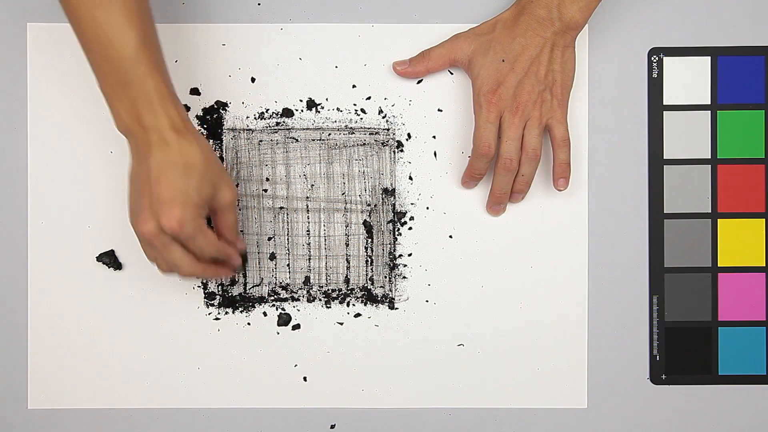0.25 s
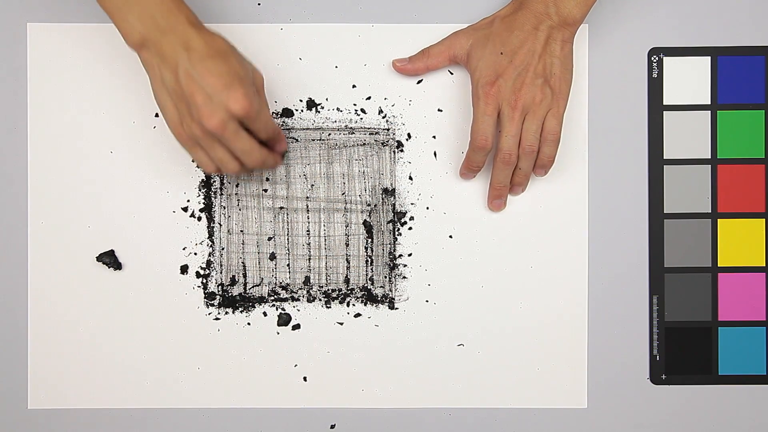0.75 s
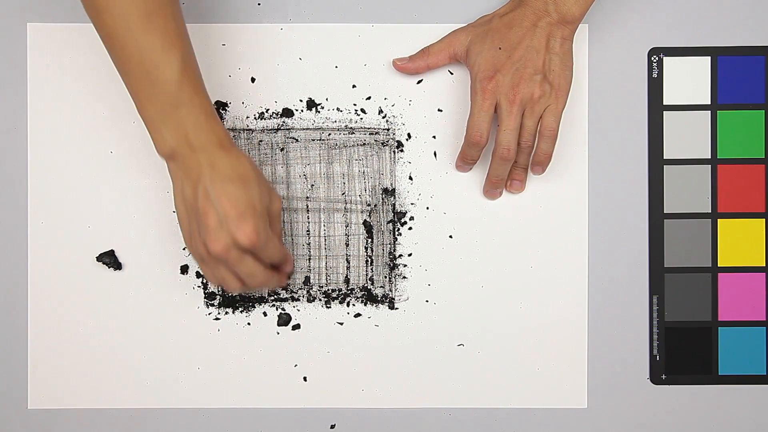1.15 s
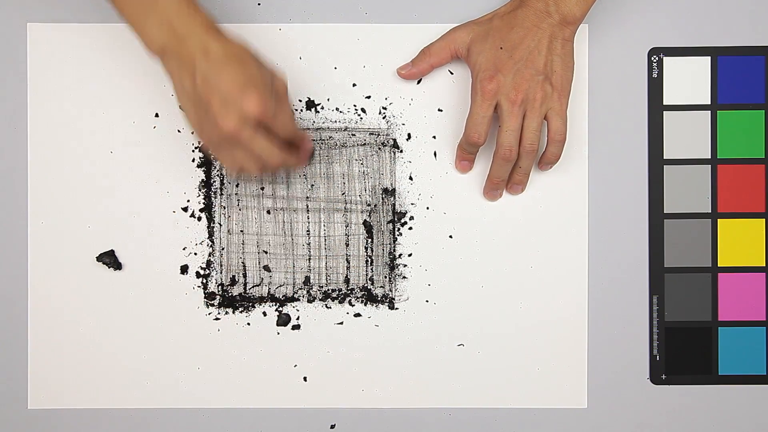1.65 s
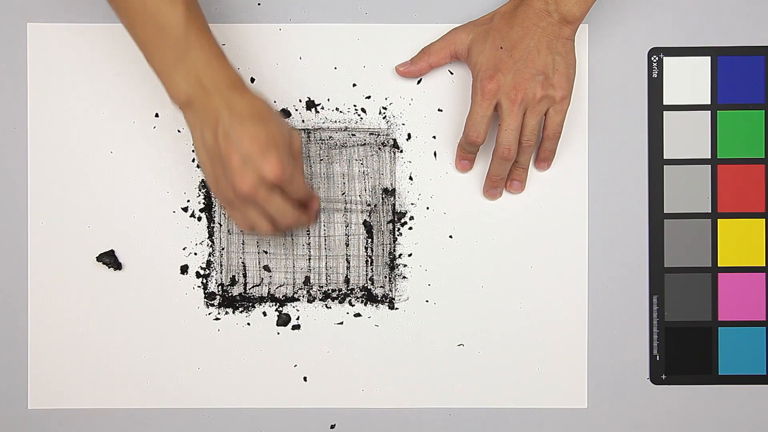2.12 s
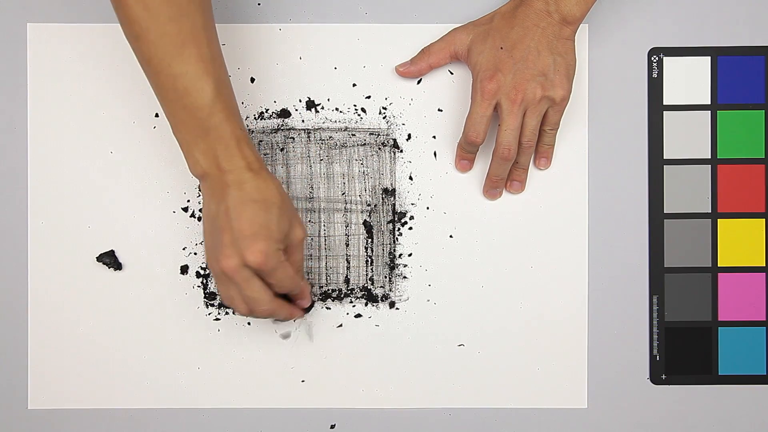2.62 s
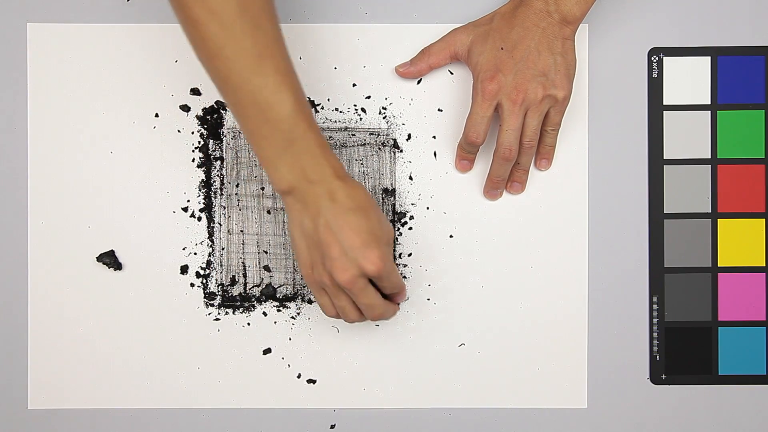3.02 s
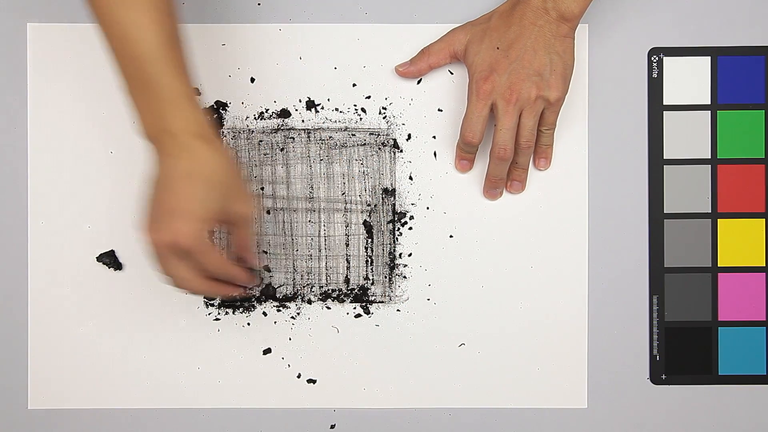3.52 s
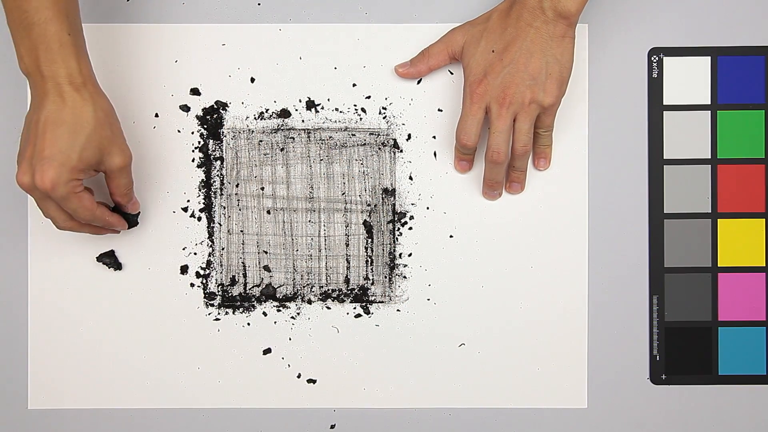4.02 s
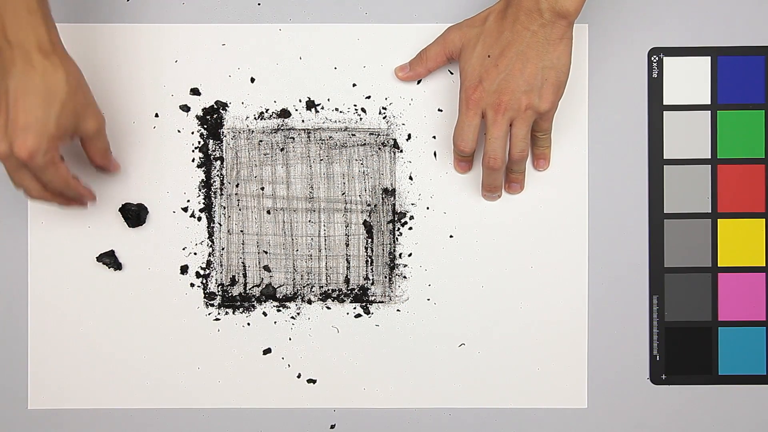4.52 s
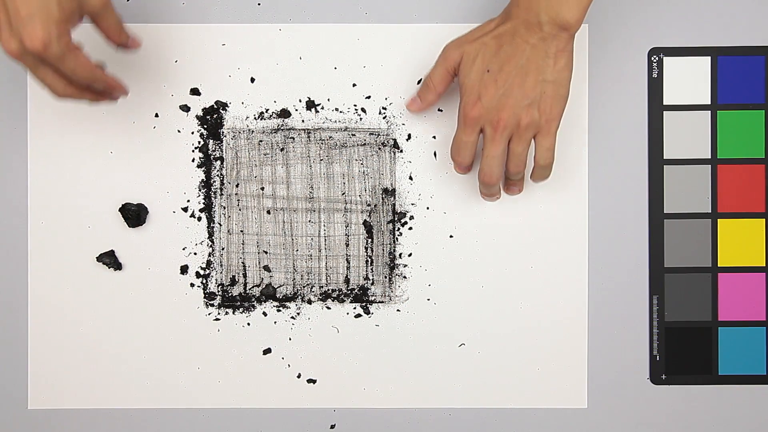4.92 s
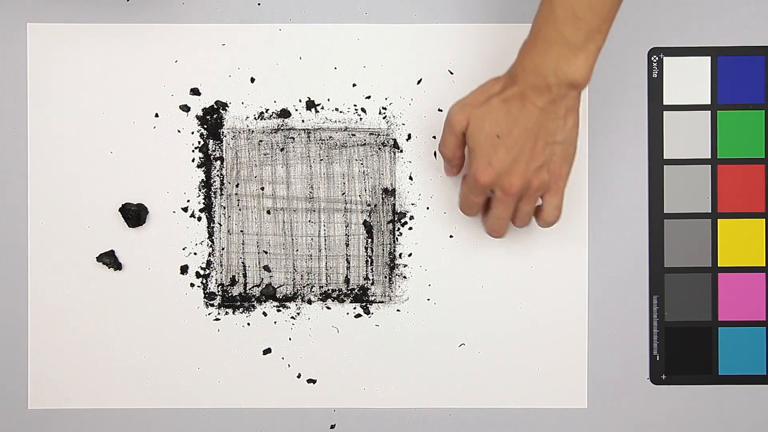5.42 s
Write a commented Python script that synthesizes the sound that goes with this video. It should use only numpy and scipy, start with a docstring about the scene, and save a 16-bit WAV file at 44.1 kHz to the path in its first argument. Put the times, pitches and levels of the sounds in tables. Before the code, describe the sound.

Very close, dry stereo sound in a small quiet room. It opens on the clipped tail of a charcoal stroke, a bright scratch with sharp ticks, gone within 0.1 s; a small knock follows at 0.35 s. From about 0.7 to 1.4 s the lump scrapes heavy paper, swelling to its strongest near 1.1 s, hissy and gritty, with tiny snaps afterwards. A second, coarser stroke grinds from 1.9 to 2.6 s, ending in a cluster of loud, brittle crumb snaps and a dull table knock at 2.7 s, then crackles fading by 2.9 s. A short scratch comes at 3.1 to 3.35 s, with little clicks at 3.5 s. Then it is nearly quiet: soft low pops in alternating strong and weak turns until 5.2 s, a light set-down tap at 4.2 s, faint skin rustles, clearest with a soft bump at 5.2 to 5.3 s, over slightly rising room rumble and hiss.

```python
"""On a table in a quiet room, a lump of charcoal is dragged over heavy paper close to a stereo microphone.
Shaped noise and uneven jolts make the grit catching on the paper's tooth; decaying rings and noise bursts
make the snapping crumbs. Resonances hum as the table, and the stand sways at the bottom of hearing.
Later the lump is set down, swells of noise brush by as a hand slides off the sheet, and soft low pops,
single pushes of pressure, come in strong and weak turns."""
import sys
import numpy as np
from scipy import signal
from scipy.fft import rfft, irfft, next_fast_len
from scipy.io import wavfile
from scipy.ndimage import uniform_filter1d, map_coordinates

SR = 44100
rng = np.random.default_rng(int(sys.argv[2]) if len(sys.argv) > 2 else 0)


def int16_out(signal):
    """Quantize to a 16-bit WAV file."""
    q = np.round(np.clip(np.atleast_2d(signal).T, -1, 1) * 32767)
    wavfile.write(sys.argv[1], SR, q.astype(np.int16))


N = 249606

# One curve for each stroke of the lump, from touch to lift: (t/s, hiss level/dB, grind level/dB)
STROKES = [
    [(0, -38.5, -54.5), (.035, -52.5, -61), (.06, -61.5, -73.5)],
    [(.685, -67, -73), (.79, -53.5, -69.5), (.84, -51.5, -55.5), (.92, -53.5, -59), (1.07, -43, -55),
     (1.12, -36, -53.5), (1.22, -39.5, -53), (1.275, -38, -54.5), (1.36, -48.5, -62), (1.39, -47, -57.5),
     (1.415, -53, -59)],
    [(1.869, -59.5, -72), (1.91, -53.5, -69.5), (1.95, -44.5, -56), (2.02, -49.5, -53.5), (2.11, -40, -54),
     (2.18, -41, -49.5), (2.3, -43, -48.5), (2.5, -52, -57.5), (2.545, -53.5, -63), (2.565, -65.5, -69),
     (2.62, -58.5, -68)],
    [(3.094, -62.5, -74), (3.128, -44.5, -54.5), (3.15, -62.5, -66), (3.2, -62.5, -70.5),
     (3.25, -55.5, -60), (3.285, -47, -55), (3.34, -49.5, -69.5)],
]
# How each stroke couples to paper and table, and how the lump lingers after it:
# (sheet drone/dB, table hum/dB, lingering/s, hiss as it starts/dB, hiss as it ends/dB)
CONTACT = [(-80, -67.5, 0.072, -76, -82), (-77.5, -77, 0.091, -70, -82.5), (-73.5, -70, .3, -73.5, -86.5),
           (-66, -72, .2, -80, -80)]
# Lump and fingers knocking the table: (t/s, strength/dB)
KNOCKS = [(.06, -66.5), (0.351, -52.5), (2.693, -40), (3.518, -60), (4.213, -54.5), (5.201, -60),
          (5.23, -75)]
# Resonances of the table top: (f/Hz, width/Hz, level/dB)
TABLE = [(84, 4.3, -2), (131.5, 17, 1.5), (243, 7.9, -6.5), (333.9, 17.2, -4)]
# Stereo image of the paper sounds: (f/Hz, left-right likeness, 1 = identical)
ALIKE = [(130, .8), (330, 0.98), (640, 0.65), (2500, 1), (4500, 1), (6800, 1), (15000, 0.8)]


def amp(db):
    """Decibels to a linear gain."""
    return 10 ** (np.asarray(db) / 20)


def unit(x):
    """Scale to an RMS of one."""
    return x / np.sqrt(np.mean(x ** 2) + 1e-20)


def along(points, hz):
    """Read (f/Hz, value) points on a log frequency axis."""
    f, values = np.transpose(points)
    return np.interp(np.log(hz + 1), np.log(f + 1), values)


def curves(rows):
    """One value per sample for each column after the time."""
    s, *columns = np.transpose(rows)
    t = np.arange(N) / SR
    return [np.interp(t, s, column) for column in columns]


def peaks(rows, floor_db):
    """Level in dB of (t/s, peak/dB, rise/dB per s, fall/dB per s) humps; the loudest wins."""
    t = np.arange(N) / SR
    humps = [db - np.where(t < s, (s - t) * rise, (t - s) * fall) for s, db, rise, fall in rows]
    return np.max(humps + [np.full(N, floor_db)], axis=0)


def wobble(rate):
    """A smooth random curve with rate knots a second."""
    knots = rng.standard_normal(int(N * rate / SR) + 4)
    return map_coordinates(knots, [np.arange(N) * rate / SR])


def filtered(x, response):
    """Filter x by a complex response of frequency, with room for the ringing to end."""
    m = next_fast_len(N + SR // 2)
    return irfft(rfft(x, m) * response(np.fft.rfftfreq(m, 1 / SR)), m)[..., :N]


def coloured(x, colour):
    """Shape x by (f/Hz, gain/dB) points, then level it to an RMS of one."""
    return unit(filtered(x, lambda hz: amp(along(colour, hz))))


def ringing(modes):
    """Causal response of (f/Hz, width/Hz, level/dB) resonances, in alternating polarity."""
    def response(f):
        total = 0
        for k, (centre, width, db) in enumerate(modes):
            damping = 1j * f * width
            total = total + (-1) ** k * amp(db) * damping / (centre ** 2 - f ** 2 + damping)
        return total
    return response


def spread(pair, alike):
    """Blend two unrelated signals as mid and side, so left and right get the given likeness."""
    def mid_side(hz):
        turn = np.arccos(np.clip(along(alike, hz), -1, 1)) / 2
        return np.array([np.cos(turn), np.sin(turn)])
    mid, side = filtered(pair, mid_side)
    return np.array([mid + side, mid - side])


def panned(db):
    """Left and right gains for a left-over-right difference in dB."""
    return amp(db * np.array([[.5], [-.5]]))


LIFT_S, LEAVE_S = .02, .022  # fall at the lift, fade as the lingering ends


def contact():
    """Levels of hiss, grind, drone and hum: a quick touch, the stroke, a lift, a faint lingering."""
    touch_s, off_db = .008, -105  # rise at the touch, level between strokes
    linger_grind_db = -3  # grind against hiss while the lump lingers
    rows = []
    for stroke, (*coupling, linger_s, start_db, end_db) in zip(STROKES, CONTACT):
        lift = stroke[-1][0] + LIFT_S
        tail = [(lift, start_db), (lift + linger_s, end_db), (lift + linger_s + LEAVE_S, off_db)]
        line = [(stroke[0][0] - touch_s, off_db, off_db)]
        line += stroke
        line += [(s, db, db + linger_grind_db) for s, db in tail]
        rows += [(*row, *coupling) for row in line]
    hiss, grind, drone, hum = curves(rows)

    # dB per dB of hiss and of grind: slow, heavy contact drones most, always 8 dB or more under the hiss
    def follow(db, per_hiss, per_grind):
        return np.minimum(db + per_hiss * (hiss + 45) + per_grind * (grind + 55), hiss - 8)
    return hiss, grind, follow(drone, -.21, .81), follow(hum, -.53, 1)


def strokes():
    """Fine dust hisses; coarser grains catch as single jolts of very uneven size, in clumps."""
    # Dry, bright dust on the paper: (f/Hz, gain/dB)
    hiss_colour = [(5000, -47.5), (8000, -9), (12000, -2.5), (15700, -13.5)]
    # Grains scratching, between dust and grind: (f/Hz, gain/dB)
    scratch_colour = [(3000, -36.5), (4400, -7.5), (5100, -4), (6300, -5.5), (7500, -7.5), (14000, -38)]
    # The lump's body grinding along: (f/Hz, gain/dB)
    grind_colour = [(700, -39.5), (1150, -13.5), (1900, -4), (2900, -2.5), (3900, -2), (9000, -34)]
    # Paper lifting off the table: (f/Hz, width/Hz, level/dB)
    sheet_modes = [(635, 250, 1.5), (965, 37, 1.5)]
    hiss_db, grind_db, drone_db, hum_db = contact()
    scratch_db = -1 + hiss_db + .39 * (grind_db - hiss_db)  # 39 % of the way from hiss to grind, less 1 dB

    clumps = amp(1.0 * wobble(35) + 1.1 * wobble(250))
    catches = rng.random(N) < .03 * amp(4 * wobble(30))  # chance per sample
    sizes = amp(np.minimum(4 * rng.exponential(size=N), 14))  # capped at 14 dB
    jolts = unit(catches * rng.choice([-1, 1], size=(2, N)) * sizes)
    coarse = amp(-7 - .4 * (np.clip(hiss_db, -70, -30) + 45))  # light, slow contact is grittier

    paper = np.zeros((2, N))
    layers = (hiss_colour, hiss_db), (scratch_colour, scratch_db), (grind_colour, grind_db)
    for colour, db in layers:
        flutter = clumps * amp(.87 * wobble(50))
        grit = (rng.standard_normal((2, N)) + coarse * jolts) / np.sqrt(1 + coarse ** 2)
        paper += amp(db) * coloured(flutter * grit, colour)
    for modes, db in (sheet_modes, drone_db), (TABLE, hum_db):
        paper += amp(db) * unit(filtered(rng.standard_normal((2, N)), ringing(modes)))
    return spread(paper, ALIKE)


def crumbs():
    """Chance rows of small snaps after each lift, sinking with the lingering hiss."""
    per_s, over_hiss_db, centre_hz = 45, 25, 5500
    rows = []
    for stroke, (_, _, linger_s, start_db, end_db) in zip(STROKES, CONTACT):
        count = int(per_s * linger_s) + 1
        for u, size, pitch in rng.random((16, 3))[:count]:
            s = stroke[-1][0] + LIFT_S + u * (linger_s + LEAVE_S)
            db = start_db + u * (end_db - start_db) + over_hiss_db + 10 * (size - .5)
            rows.append((s, db, centre_hz * 2 ** (pitch - .5)))  # half an octave either way
    return rows


def snaps():
    """A crumb breaks: one sharp jolt, a few cycles of ring and a burst of splinters."""
    # Crumbs snapping: (t/s, level/dB, ring f/Hz)
    snap_rows = [(0.012, -18, 12200), (0.039, -27.5, 10900), (0.1195, -46.5, 8650), (0.1423, -38.5, 4360),
                 (0.3325, -50, 5470), (0.353, -43.5, 4000), (0.6801, -35.5, 9200), (0.707, -32.5, 11300),
                 (1.2667, -23, 11800), (1.4896, -46, 4160), (1.4964, -43.5, 4700), (1.5014, -41.5, 4600),
                 (1.8763, -30.5, 9930), (2.179, -24, 10800), (2.449, -17.5, 11900), (2.4945, -17, 11900),
                 (2.5441, -24, 12200), (2.5714, -16, 11200), (2.581, -27.5, 13500), (2.5996, -21.5, 7300),
                 (2.6144, -23.5, 11620), (2.6919, -28.5, 4900), (2.6927, -20, 11900), (2.7022, -32, 5530),
                 (2.7204, -37, 4670), (2.7812, -41.5, 3150), (2.8094, -46, 4780), (2.8362, -39, 4930),
                 (2.8597, -41, 5160), (2.8848, -24.5, 3880), (2.8937, -36.5, 3870), (3.1499, -29.5, 8600),
                 (3.521, -38.5, 4450), (3.5402, -35.5, 3480), (3.545, -35.5, 5500), (3.5503, -40, 4400),
                 (4.2142, -39, 2720), (4.2674, -49, 6900), (4.3486, -49.5, 12300), (4.8865, -52.5, 4800)]
    out = np.zeros((2, N + SR))
    t = np.arange(SR // 40) / SR
    for s, db, hz in snap_rows + crumbs():
        ring = np.sin(2 * np.pi * hz * t) * amp(-60 * t * hz / 9)  # falls 60 dB in nine cycles
        jolt = -.7 * amp(-60 * t * hz / 1.7)  # a duller crumb breaks more slowly
        noise = rng.standard_normal((3, len(t)))
        splinters = noise[0] + .31 * noise[1:]  # mostly shared by left and right
        crack = splinters * (.23 * amp(-60 * t / .0037) + .068 * amp(-60 * t / .033))
        place = panned(rng.normal(0, 3.5))  # each crumb in its own place, scattered by 3.5 dB
        start = round(s * SR)
        out[:, start:start + len(t)] += amp(db) * place * (jolt + ring + crack)
    return filtered(out[:, :N], lambda f: (1j * f / (1500 + 1j * f)) ** 3)  # thins out below 1500 Hz


def rocking():
    """Strokes and knocks set the table rocking on its legs; it tips the two capsules in opposite ways."""
    mode = ringing([(47, 5, 0)])  # f/Hz, width/Hz, level/dB
    rub_db, blow_db = -3, 46.5  # rubbing against the table hum, blows against the knocks
    push = rng.standard_normal(N)
    push *= amp(contact()[3] + rub_db) / np.std(filtered(push, mode))
    for s, db in KNOCKS:
        push[round(s * SR)] += amp(db + blow_db)
    return filtered(push, mode) * [[1], [-1]]


def room():
    """Low rumble, hiss and two thin whines from filtered noise, over the slow sway of the stand."""
    # Quiet air of the room: (t/s, rumble level/dB, hiss level/dB)
    air_rows = [(0, -82, -90.5), (3.3, -84.5, -89), (4.3, -78.5, -85), (5.66, -74, -81.5)]
    # Tone of the rumble: (f/Hz, gain/dB)
    rumble_colour = [(30, -16.5), (50, 2), (170, -12), (900, -17.5), (3000, -29.5)]
    # Tone of the room hiss: (f/Hz, gain/dB)
    fizz_colour = [(800, -7), (2500, 3.5), (4000, 3.5), (6000, -5), (13500, -14.5), (15700, -17)]
    # Faint narrow whines: (f/Hz, level against the hiss/dB)
    whine_rows = [(1238, -8.5), (2376, -10.5)]
    # The stand is nudged, then settles: (t/s, peak/dB, rise/dB per s, settling/dB per s)
    sway_rows = [(0, -41, 100, 171), (1.2, -61, 24.5, 25.5), (1.951, -63.5, 88.5, 3.5),
                 (3.15, -54.5, 182.5, 10), (5.351, -56, 54, 9.5)]

    def noise():
        return rng.standard_normal((2, N))
    rumble_db, hiss_db = curves(air_rows)
    rumble = amp(rumble_db + 2.3 * wobble(11)) * coloured(noise(), rumble_colour)
    hiss = amp(hiss_db) * coloured(noise(), fizz_colour)
    whines = np.zeros((2, N))
    for hz, db in whine_rows:
        whines += amp(hiss_db + db) * unit(filtered(noise(), ringing([(hz, 14, 0)])))

    swing = ringing([(13.8, 7.4, -5.5), (25.0, 13, -3.5)])
    sway = filtered(filtered(noise(), swing), swing)
    sway /= np.sqrt(np.abs(uniform_filter1d(sway ** 2, size=SR // 6)))  # rocks evenly, cycle after cycle
    sway *= amp(peaks(sway_rows, -70))  # -70 dB at rest
    likeness = [(25, .17), (70, .61), (130, .45), (2500, .65), (12000, .13)]  # f/Hz, left-right likeness
    return spread(rumble + hiss + whines + sway, likeness)


def knocks():
    """A soft blow rings the table top and adds a short dull puff."""
    blows, puffs = np.zeros(N), np.zeros(N + SR)
    t = np.arange(SR // 20) / SR
    for s, db in KNOCKS:
        start = round(s * SR)
        blows[start] = amp(db)
        puffs[start:start + len(t)] += amp(db - 60 * t / .018) * rng.standard_normal(len(t))
    thump = amp(33.5) * filtered(blows, ringing(TABLE))
    puff = filtered(puffs[:N], ringing([(890, 2800, 7.9)]))
    return (thump + puff) * panned(2)  # a little to the left


def pops():
    """Each pop is one push of pressure: it jumps up fast, holds and sinks back more slowly."""
    # Low pops: (t/s, level before a common 8 dB lift/dB)
    pop_rows = [(1.164, -71.5), (3.515, -65), (3.656, -74), (3.793, -59.5), (3.938, -70), (4.069, -58.5),
                (4.37, -58), (4.514, -68), (4.643, -59), (4.802, -67.5), (4.948, -57), (5.092, -67),
                (5.218, -53.5)]
    out = np.zeros(N + SR)
    t = np.arange(SR // 20) / SR
    push = (1 - np.exp(-t / .00067)) * np.exp(-(t / .0048) ** 3)
    for s, db in pop_rows:
        start = round(s * SR)
        out[start:start + len(t)] += amp(db + 8) * push
    return out[:N]


def slide():
    """Skin brushes the sheet: a soft wide rustle that swells and fades roundly."""
    # Brushes of the hand: (peak t/s, peak/dB, rise/s, fall/s)
    brush_rows = [(4.19, -80, .2, 0.11), (4.86, -81, .08, 0.083), (5.202, -66.5, 0.0044, 0.023),
                  (5.29, -68.5, 0.03, .025)]
    span_db, roundness = 23, 2.6  # drop after one rise or fall time; 2 is rounded, more is flatter on top
    soft = [(300, -6), (1800, -7.5), (5000, -14), (11000, -20), (14000, -42.5)]  # f/Hz, gain/dB
    rustle = rng.standard_normal((2, N)) * amp(2.97 * wobble(150))
    t = np.arange(N) / SR
    swell = np.zeros(N)
    for s, db, rise, fall in brush_rows:
        away = np.abs((t - s) / np.where(t < s, rise, fall))
        swell += amp(db - span_db * away ** roundness)
    return swell * spread(coloured(rustle, soft), ALIKE)


def walls(x):
    """A short answer from the room: a decaying noise tail, 300 samples late."""
    t = np.arange(SR // 3) / SR
    tail = rng.standard_normal((2, len(t))) * amp(-60 * t / .21)  # falls 60 dB in 0.21 s
    late = np.pad(x, ((0, 0), (300, 0)))
    return signal.fftconvolve(late, tail / np.linalg.norm(tail[0]), axes=1)[:, :N]


def scene():
    """The close sounds with their faint room answer, plus rocking, pops and room."""
    near = strokes() + snaps() + knocks() + slide()
    far = amp(-19) * walls(near)
    return near + far + rocking() + pops() + room()


def record(dry):
    """The left capsule is hotter at both ends and lags in bass and treble; the top thins out, then stops."""
    # Mismatch of the microphone pair: (f/Hz, left over right/dB, left lag/rad)
    pair_rows = [(59.7, 4.5, 0.28), (700, 1.5, 0), (4500, 0.2, 0.16), (10510, 0, 0.037), (13900, 1.5, 1)]
    edge_hz, slope_hz, top_hz = 15600, 250, 16700
    f, hotter_db, lag = np.transpose(pair_rows)
    half = np.array([[.5], [-.5]])  # each capsule takes half the mismatch

    def response(hz):
        pair = panned(np.interp(hz, f, hotter_db)) * np.exp(-1j * half * np.interp(hz, f, lag))
        thin = amp(-30 * np.clip((hz - edge_hz) / slope_hz, 0, 1))
        return pair * thin * (hz < top_hz)
    return filtered(dry, response)


dry = scene()
out = record(dry)
int16_out(out)
```